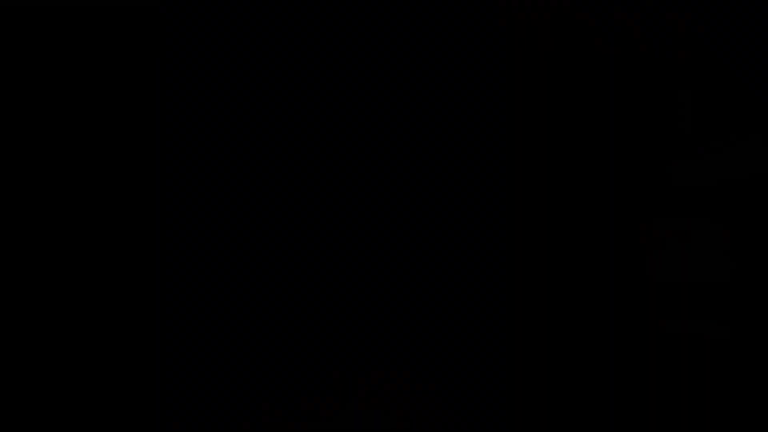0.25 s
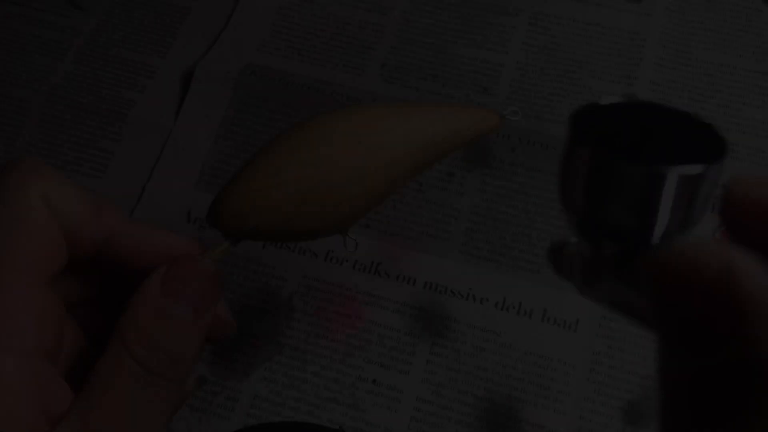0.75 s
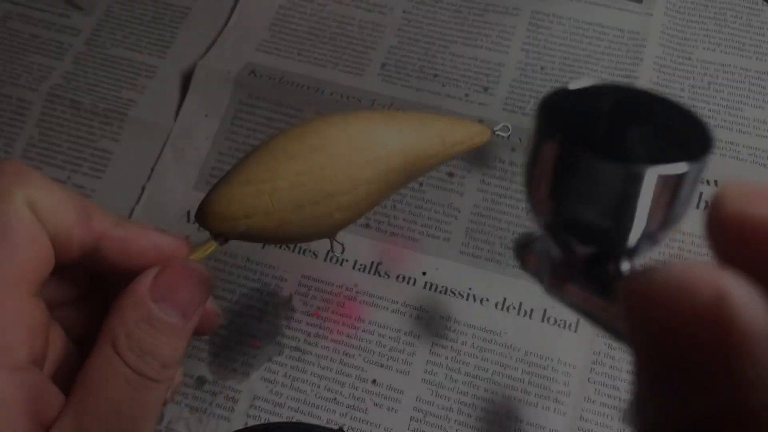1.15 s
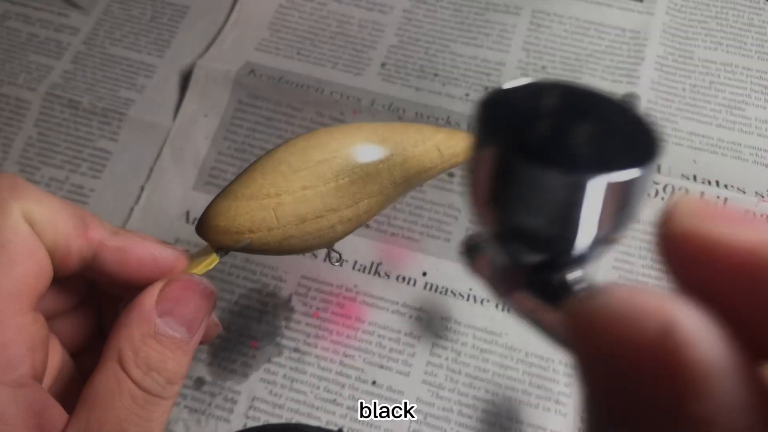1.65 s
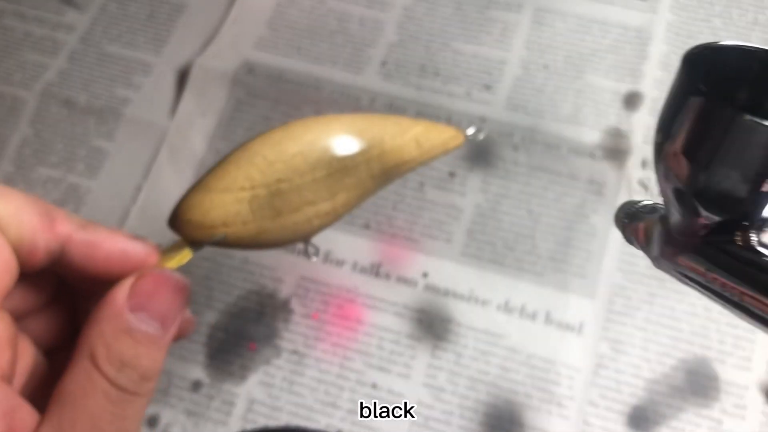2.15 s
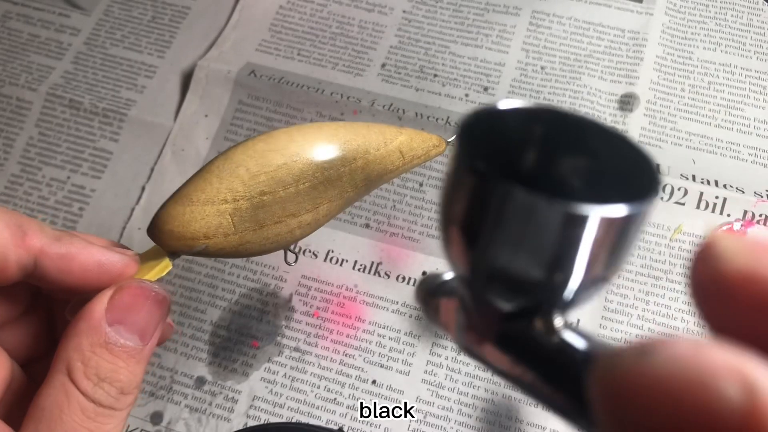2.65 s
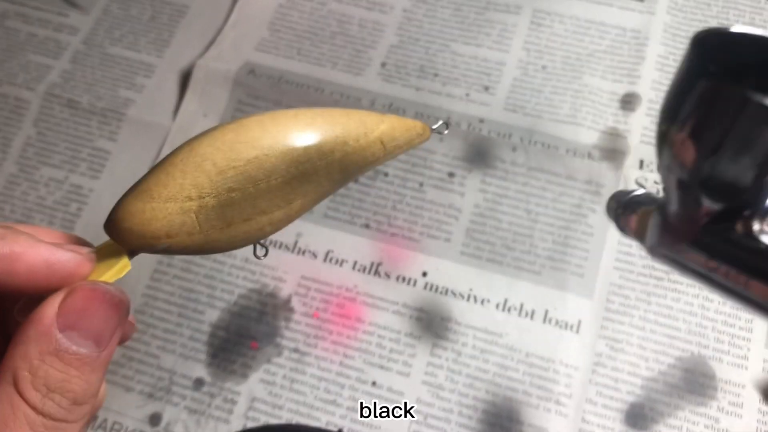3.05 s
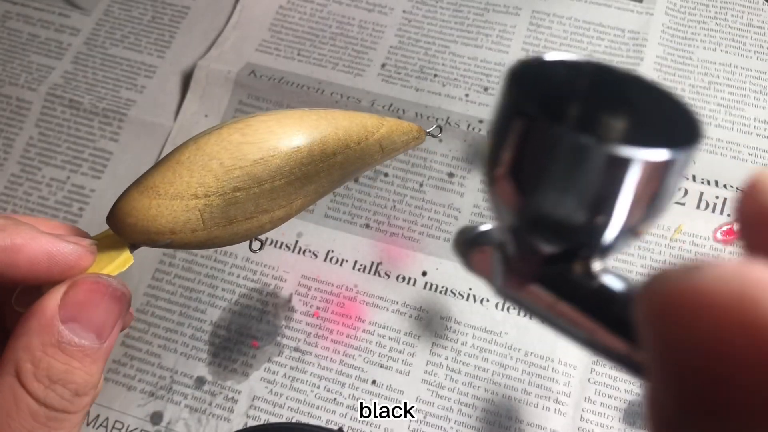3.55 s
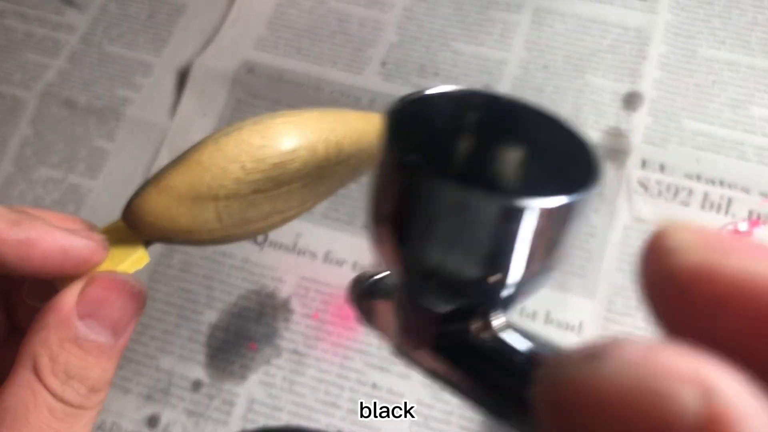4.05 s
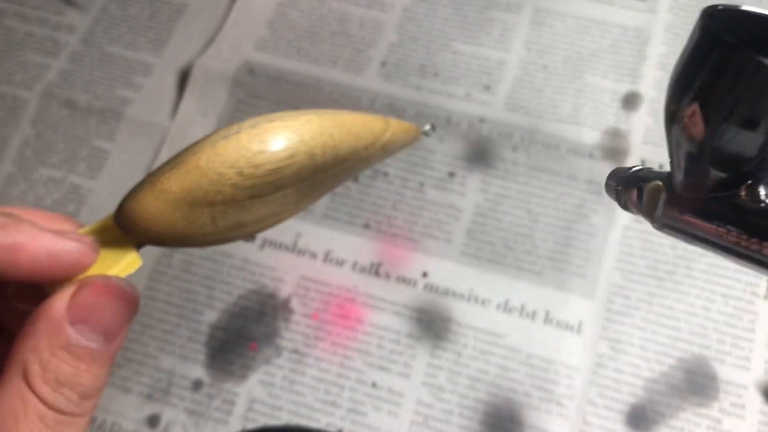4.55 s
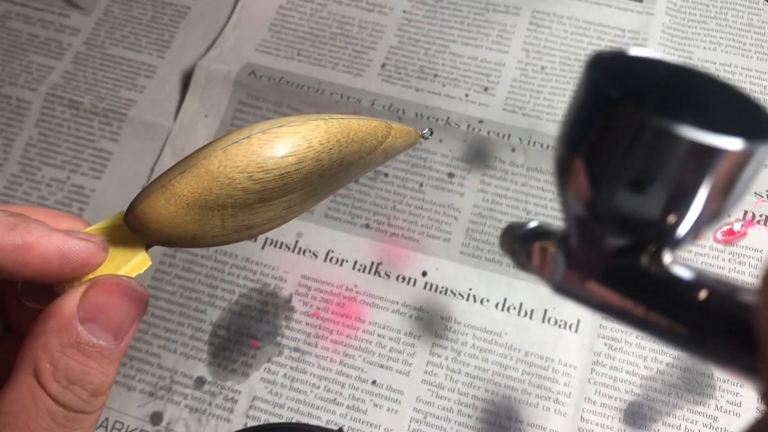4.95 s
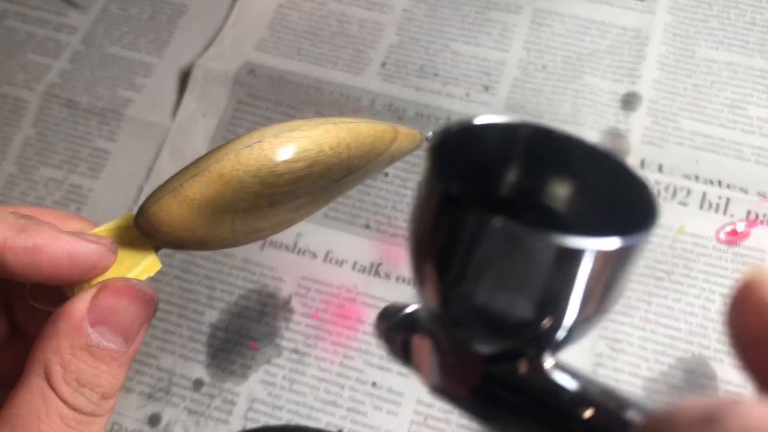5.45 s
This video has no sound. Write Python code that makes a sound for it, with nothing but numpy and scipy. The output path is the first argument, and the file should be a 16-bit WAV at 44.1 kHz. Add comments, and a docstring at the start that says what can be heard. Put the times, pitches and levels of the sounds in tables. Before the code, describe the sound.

In a quiet indoor workshop, fingers rub softly on a metal airbrush and a sharp click sounds. An extractor fan hum comes in abruptly and stays low and wavering. At about one second the air valve opens smoothly, and a bright, dense hiss runs close to the microphone to the end, its colour gliding with the hand strokes.

```python
"""Airbrush spraying a lure

After some handling and a sharp click, an extractor fan hums in a quiet room: wavering tones over a draught.
Then the air valve opens close to the microphone: the jet is coloured noise, with a lower rush at the wooden lure.
The hand draws the nozzle back in three strokes. Short reflections, whose delays follow the hand,
comb the spray with gliding ripples."""
import sys
import numpy as np
from scipy import signal
from scipy.fft import rfft, irfft, next_fast_len
from scipy.io import wavfile
from scipy.ndimage import map_coordinates

SR = 44100
rng = np.random.default_rng(int(sys.argv[2]) if len(sys.argv) > 2 else 0)


def waveform_to_disk(signal):
    """Save audio, clipped to [-1, 1], as 16-bit WAV at the path in sys.argv[1]."""
    frames = np.transpose(np.atleast_2d(signal))
    scaled = np.clip(frames, -1, 1) * 32767
    samples = np.round(scaled).astype(np.int16)
    wavfile.write(sys.argv[1], SR, samples)


N = 251370  # length in samples
TIME = np.arange(N) / SR  # the moment of each sample, in s


def amp(db):
    """Turn decibels into a gain."""
    return 10 ** (np.asarray(db) / 20)


def unit(x):
    """Scale a signal to an rms of 1."""
    return x / np.sqrt(np.mean(x ** 2) + 1e-20)


def along(points, hz):
    """Read a table of (f/Hz, value) at any frequency, on a log axis."""
    f, value = np.transpose(points)
    return np.interp(np.log(hz + 1), np.log(f), value)


def curves(rows, at=TIME):
    """Read every column after the time at the given moments."""
    times, *columns = np.transpose(rows)
    return [np.interp(at, times, column) for column in columns]


def ramp(start, length):
    """A straight rise from 0 to 1; start and length in s."""
    return np.clip((TIME - start) / length, 0, 1)


def bell(offset, half_length):
    """A smooth rise and fall that is 1 at offset 0."""
    return np.exp(-(offset / half_length) ** 2)


def wobble(rate):
    """A smooth random curve through `rate` random points a second."""
    knots = rng.standard_normal(int(N * rate / SR) + 4)
    return map_coordinates(knots, [TIME * rate])


def filtered(x, response):
    """Multiply the spectrum of x by a gain that depends on frequency."""
    size = next_fast_len(N + 8192)
    hz = np.fft.rfftfreq(size, 1 / SR)
    return irfft(rfft(x, size) * response(hz), size)[..., :N]


def noise(spectrum):
    """Random noise coloured by a table of (f/Hz, level/dB), with an rms of 1."""
    white = rng.standard_normal(N)
    return unit(filtered(white, lambda hz: amp(along(spectrum, hz))))


# colour of the still room: f/Hz, level/dB (per Hz, relative)
ROOM_COLOUR = [(30, -12), (90, 2.5), (170, 2.5), (450, -4), (700, -9), (1200, -6.5), (1900, -13.5),
               (2600, -15), (4000, -16.5), (7000, -20.5), (11000, -26.5), (15000, -29)]


def room(level_db=-58):
    """The still room is a steady, soft noise."""
    return amp(level_db) * noise(ROOM_COLOUR)


BLADE_HZ, HUM_DB = 106.3, -61  # reference rate of the fan blades; level of the hum between swells
# the hum swells now and then: t/s, rise level/dB, half length/s
HUM_SWELLS = [(1.87, 5, 0.1), (2.43, 3, 0.26), (3.271, 6, 0.11), (4.78, 7, 0.11), (5.202, 6, 0.31)]
# the tone an octave up, before its lift and random dips: t/s, level/dB
OCTAVE_LEVEL = [(0.4, -64), (0.62, -56.5), (0.92, -60.5), (1.77, -56), (1.92, -69), (1.98, -56.5),
                (2.77, -63), (2.83, -55.5), (4.44, -61), (4.54, -69), (4.63, -56), (5.65, -63)]
# weaker fan tones: multiple of BLADE_HZ, level/dB
OVERTONES = [(3, -68), (4, -74), (5, -76), (9, -71.5)]
# narrow drones of motor and housing: f/Hz, width/Hz (rate of the phase drift), level/dB
DRONES = [(41.8, 0.77, -73.5), (76.5, 2.95, -67.5), (131.2, 6.5, -70), (161.8, 2.9, -70.5)]
# colour of the air drawn through the fan: f/Hz, level/dB (per Hz, relative)
DRAUGHT_COLOUR = [(30, -35), (55, -20), (100, -26), (250, -2), (480, -15.5), (580, -7), (680, 1.5),
                  (860, -2.5), (1130, -15.5), (1450, -5.5), (2000, -7), (2700, -5), (4200, -14.5),
                  (15000, -33.5)]


def fan(draught_db=-54, waver_db=2, blade_waver_db=1.1, octave_db=1.0, octave_dip_db=2.0, drift_hz=0.28):
    """Turning blades make wavering tones, motor and housing drone, and the moving air rushes softly."""
    phase = 2 * np.pi * np.cumsum(BLADE_HZ + drift_hz * wobble(4)) / SR

    def tone(multiple):
        return np.sqrt(2) * np.sin(multiple * phase + rng.uniform(0, 2 * np.pi))

    swell_db = sum(rise_db * bell(TIME - s, half) for s, rise_db, half in HUM_SWELLS)
    # the main hum lies a touch below the reference rate
    hum = amp(HUM_DB + swell_db + blade_waver_db * wobble(6)) * tone(0.99)
    # the random dips only ever take level away
    octave_level_db = curves(OCTAVE_LEVEL)[0] + octave_db - octave_dip_db * np.abs(wobble(6))
    octave = amp(octave_level_db) * tone(2)
    overtones = sum(amp(db + waver_db * wobble(6.5)) * tone(multiple) for multiple, db in OVERTONES)
    # a drone is a tone whose phase wanders
    drones = sum(amp(db) * unit(np.cos(2 * np.pi * hz * TIME + wobble(width)))
                 for hz, width, db in DRONES)
    draught = amp(draught_db) * noise(DRAUGHT_COLOUR)
    return (hum + octave + overtones + drones + draught) * ramp(0.336, 0.011)


# fingers shifting their grip: t/s, peak level/dB, half length/s
RUBS = [(0.133, -51.5, 0.019), (0.197, -52, 0.05), (0.298, -52.5, 0.035)]
# colour of the rubbing: f/Hz, level/dB (per Hz, relative)
RUBBING_COLOUR = [(60, -28), (170, -0.5), (300, -6), (500, -3), (720, -18), (1200, -14.5), (3000, -43)]


def grip():
    """Fingers rub softly as they settle on the airbrush: low noise in short swells."""
    loudness = sum(amp(db) * bell(TIME - s, half) for s, db, half in RUBS)
    return noise(RUBBING_COLOUR) * loudness


# dull tones of the knocked body: f/Hz, level/dB (relative), t60/s (time to fade by 60 dB)
KNOCK_TONES = [(248, -6, 0.13), (336, -2, 0.094), (416, -1.5, 0.098), (481, -3.5, 0.13), (913, -3, 0.077),
               (1020, -1.5, 0.034), (1220, -3.5, .027)]


def knock(t):
    """The struck body rings in fading tones, a little differently each time."""
    total = np.zeros(len(t))
    for hz, db, t60 in KNOCK_TONES:
        fade = amp(db + rng.standard_normal() - 60 * t / t60)
        total += fade * np.sin(2 * np.pi * (hz * t + rng.random()))
    return total


# contacts of the metal airbrush: t/s, level/dB of the whole contact, extra level/dB of its knock (both relative)
CONTACTS = [(0.1936, -28, -30), (0.1974, -14.5, -1.5), (0.2012, -37, -1), (0.2095, -27.5, 5),
            (0.3166, -43.5, -8)]
# colour of their crack: f/Hz, level/dB (per Hz, relative)
CRACK_COLOUR = [(700, -14), (1800, -30), (2600, -11.5), (4000, -11.5), (4700, -1.5), (6900, -0.5),
                (7700, -14), (10000, -13), (12500, -23), (14200, -27), (15000, -12), (15800, -18)]


def clicks(crack_db=-5, crack_t60=0.014, knock_db=-21, tail_db=-24, tail_t60=0.12, rise=0.00041):
    """Each contact cracks, knocks the body and leaves a short tail in the room."""
    out = np.zeros(N)
    t = np.arange(SR // 4) / SR
    for s, db, body_db in CONTACTS:
        crack_fade = amp(crack_db - 60 * t / crack_t60)
        tail_fade = amp(tail_db - 60 * t / tail_t60)
        crack = noise(CRACK_COLOUR)[:len(t)] * (crack_fade + tail_fade)
        body = amp(knock_db + body_db) * knock(t)
        onset = 1 - np.exp(-t / rise)
        out[round(s * SR):][:len(t)] += amp(db) * (crack + body) * onset
    return out


REST_BACK, CREEP_PER_S = 0.42, 0.037  # nozzle position at t = 0 (0-1), and its creep towards the lure
RETURN_SLOWER = 1.6  # the way back in takes this many times longer
# strokes away from the lure: t/s at the far end, reach (0-1), time to draw back/s
STROKES = [(2.211, 0.34, 0.18), (3.126, 0.57, .296), (4.569, 0.63, 0.27)]


def drawn_back(t):
    """How far the nozzle is from the lure: quick strokes out, slower returns."""
    strokes = 0
    for s, reach, out_s in STROKES:
        half_length = np.where(t < s, out_s, out_s * RETURN_SLOWER)
        strokes = strokes + reach * bell(t - s, half_length)
    return REST_BACK - CREEP_PER_S * t + strokes


def pressure_db(t, press_s=2.46, db_per_s=1):
    """From press_s on, the finger gradually gives more air."""
    return db_per_s * np.maximum(t - press_s, 0)


def valve(start_s=1.0, opens_s=0.21):
    """The air valve opens along a smooth S from 0 to 1."""
    return np.sin(np.pi / 2 * ramp(start_s, opens_s)) ** 2


# colour of the jet: f/Hz, level/dB (per Hz, relative)
HISS_COLOUR = [(1500, -49), (2800, -11), (3900, -8.5), (4650, -5.5), (5300, -6.5), (6600, -4), (8300, -3.5),
               (10500, -4.5), (12300, -5), (13300, -6), (14500, -4.5), (15700, -3.5)]
# how the treble moves, before treble_db is added: t/s, level/dB
TREBLE_LEVEL = [(1.2, -47.5), (1.47, -48), (2.45, -47.5), (2.6, -49.5), (3.54, -43.5), (3.85, -46.5),
                (4.43, -44), (4.52, -43), (4.97, -42), (5.29, -44.5), (5.65, -41.5)]


def jet(hiss_db=-42, far_db=-3, treble_db=9, bright_from_hz=8500, bright_to_hz=12800, flutter_db=.5):
    """Turbulent air hisses, louder with more air; below the treble it is fainter as the nozzle draws back."""
    hz, s, spectrum = signal.stft(noise(HISS_COLOUR), SR, nperseg=1024)
    body_db = hiss_db + pressure_db(s) + far_db * drawn_back(s)
    # the highest frequencies are beamed, so they have a level of their own
    beamed = np.clip((hz - bright_from_hz) / (bright_to_hz - bright_from_hz), 0, 1)[:, None]
    beam_db = curves(TREBLE_LEVEL, s)[0] + treble_db
    level_db = (1 - beamed) * body_db + beamed * beam_db
    hiss = signal.istft(spectrum * amp(level_db), SR, nperseg=1024)[1][:N]
    return hiss * valve() * amp(flutter_db * wobble(25))


# colour of the rush at the lure: f/Hz, level/dB (per Hz, relative)
IMPACT_COLOUR = [(300, -8.5), (800, -6), (1150, -8.5), (1400, -2), (1800, -0.5), (2250, -9), (2900, -7),
                 (4500, -16.5), (8000, -33)]


def impact(rush_db=-57.5, far_db=-2, push=1.4):
    """The jet breaks on the lure with a lower rush, louder with more air and with the nozzle near."""
    level_db = rush_db + push * pressure_db(TIME) + far_db * drawn_back(TIME)
    return noise(IMPACT_COLOUR) * valve() * amp(level_db)


# the hand swings aside once: t/s, sideways turn (-1 to 1)
TURN = [(1.92, -0.11), (2.44, 0.88), (2.92, 0)]
# reflections off cup, hands and lure: delay/ms, ms per unit drawn back, ms per unit turned, signed gain
ECHOES = [(.163, .04, .01, -.087), (.265, -.02, -.007, -.066), (.338, -.058, .337, -.055),
          (.482, -.108, .074, -.147), (.526, -.16, -.103, .06), (.651, -.087, .081, -.12),
          (.71, -.107, .074, -.08), (.933, -.08, -.011, -.079), (.992, .001, -.108, .064),
          (1.038, .104, .011, -.06), (1.052, -.137, -.064, -.145), (2.141, -.175, -.012, .045)]
# small objects return only short waves, and the highest are beamed past them: f/Hz, scale on all gains
REFLECTIVITY = [(1500, 0), (3000, 1.6), (10500, 1.5), (12500, .9), (15500, .9)]


def reflect(x):
    """Delayed copies from nearby things comb the spray; their paths change as the hand moves."""
    hz, s, spectrum = signal.stft(x, SR, nperseg=2048)
    back, turn = drawn_back(s), curves(TURN, s)[0]
    # the bench scatters a few weak copies, most of them later (lowest and highest value of each ECHOES column)
    scatter = rng.uniform([1.3, -.3, -.1, -.04], [6, -.03, .1, .04], size=(12, 4))
    echoes = 0
    for ms, per_back, per_turn, gain in [*ECHOES, *scatter]:
        delay_ms = ms + per_back * back + per_turn * turn
        # a delay turns the phase in proportion to frequency
        echoes = echoes + gain * np.exp(-2j * np.pi * np.outer(hz, delay_ms) / 1000)
    share = along(REFLECTIVITY, hz)[:, None]
    # the direct sound, its echoes and ever weaker echoes of echoes sum to an exponential
    return signal.istft(spectrum * np.exp(share * echoes), SR, nperseg=2048)[1][:N]


def scene(dip_db=-13):
    """Mix all sources into two equal channels; the level dips briefly at 0.34 s."""
    spray = reflect(jet() + impact())
    mono = room() + fan() + grip() + clicks() + spray
    mono = mono * amp(dip_db * bell(TIME - .341, 0.0032))
    return np.array([mono, mono])


def record(dry, low_hz=31.8, top_hz=15780):
    """The microphone side cuts the deepest bass and keeps nothing above its band limit."""
    def response(hz):
        bass_cut = 1 - 1 / (1 + (hz / low_hz) ** 12)
        top_cut = np.clip((top_hz - hz) / 300 + .5, 0, 1)
        return bass_cut * top_cut

    return filtered(dry, response)


dry = scene()
out = record(dry)
waveform_to_disk(out)
```